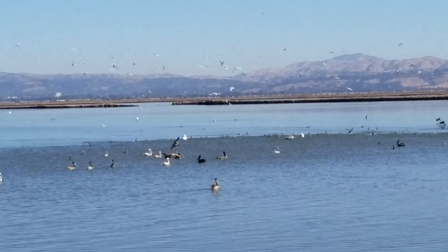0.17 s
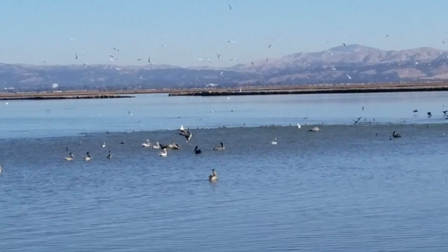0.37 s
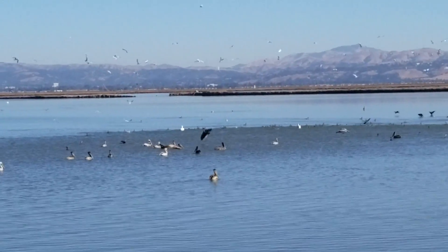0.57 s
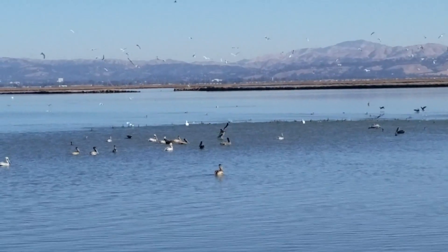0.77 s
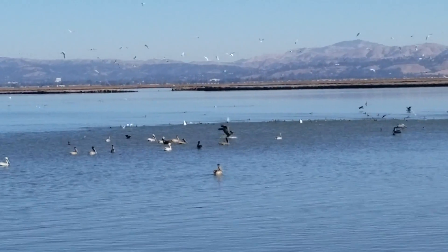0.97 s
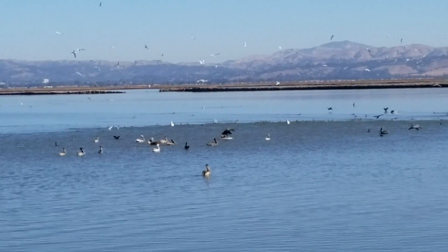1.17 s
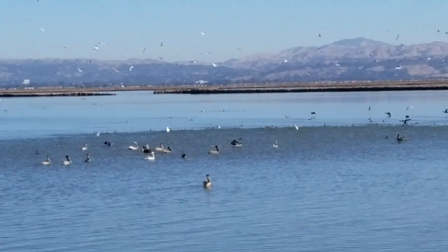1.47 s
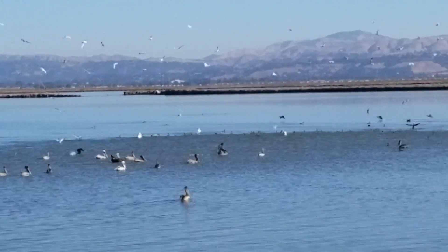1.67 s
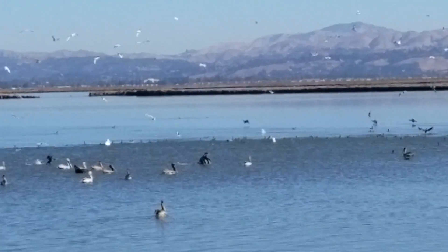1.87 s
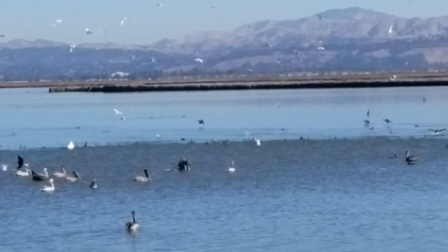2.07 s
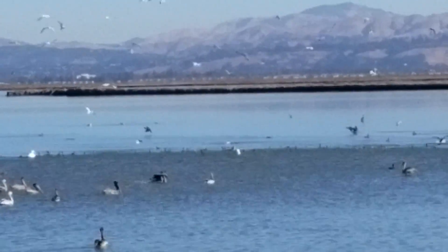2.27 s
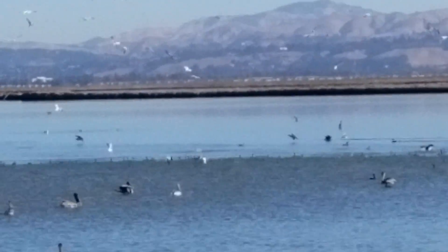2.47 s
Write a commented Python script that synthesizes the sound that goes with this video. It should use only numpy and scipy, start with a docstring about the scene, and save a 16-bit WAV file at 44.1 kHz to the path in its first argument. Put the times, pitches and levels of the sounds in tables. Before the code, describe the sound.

A flock of gulls and waterbirds calls nonstop over an open bay, with whistles, sliding chirps, pips and dry rattles; low wind rumble and faint engine hum behind, one pop on the left of a handheld stereo microphone.

```python
"""A flock of terns, gulls and waders calls over a calm bay: arched whistles, slides, short pips, trills, and
harsh keks and rattles, all swept sines, most with overtones, over a random babble of far pips.
A handheld two-microphone recorder shades its left port from part of the birds' treble; that port pops once,
a filtered pressure step, and the case rustles three times, bursts of bright noise.
Behind lie a faint engine hum of three wavering sines and a shaped noise bed of wind, water and microphone hiss."""
import sys
import numpy as np
from scipy import signal
from scipy.fft import rfft, irfft, next_fast_len
from scipy.io import wavfile
from scipy.ndimage import uniform_filter1d, map_coordinates

SR = 44100
rng = np.random.default_rng(int(sys.argv[2]) if len(sys.argv) > 2 else 0)


def log_audio(samples):
    """Write samples as a 16-bit WAV file to the path given in sys.argv[1]."""
    # one column per channel
    frames = np.atleast_2d(samples).T
    # limit to full scale, then quantise
    limited = np.clip(frames, -1, 1)
    pcm = np.round(limited * 32767).astype(np.int16)
    wavfile.write(sys.argv[1], SR, pcm)


def makeup_ratio(level_db):
    """Linear amplitude ratio for a level in decibels (20 dB per factor of ten)."""
    decades = np.asarray(level_db, float) / 20
    return 10 ** decades


N = 115101  # samples


def unit(x):
    """Scales to rms 1."""
    return x / np.sqrt(np.mean(x ** 2) + 1e-20)


def along(points, hz):
    """Reads a curve of (Hz, value) points on a log frequency axis."""
    f, v = np.transpose(points)
    return np.interp(np.log(hz + 1), np.log(f + 1), v)


def wobble(rate):
    """A smooth random curve with rate knots a second."""
    knots = rng.standard_normal(int(N * rate / SR) + 4)
    return map_coordinates(knots, [np.arange(N) * rate / SR])


def filtered(x, response):
    """Filters x by a complex response of frequency."""
    m = next_fast_len(N + SR // 2)
    return irfft(rfft(x, m) * response(np.fft.rfftfreq(m, 1 / SR)), m)[..., :N]


EDGE_S, WAVER, FLUTTER_DB = 0.0053, 0.0041, 1.08  # fade, pitch unsteadiness as a share, level unsteadiness
RASP, KEK_RASP = 0.2, 0.4  # depth of the fast roughness
# Unsteadiness shared by all calls: pitch, breath and rasp
PITCH_SHAKE, BREATH_SHAKE, RASP_SHAKE = [np.pad(wobble(rate), (0, SR)) for rate in (150, 120, 2500)]


def add_call(out, start, length, db, pitch, overtones, rasp=RASP):
    """Adds one voiced call: pitch(u) over u 0-1, overtones(multiple, Hz) its gains, with soft edges."""
    at = round(start * SR)
    t = np.arange(max(round(length * SR), 8)) / SR
    here = slice(at, at + len(t))
    hz = pitch(t / length)
    to_edge = np.minimum(t, length - t) / min(EDGE_S, length / 2)
    fade = np.sin(np.pi / 2 * np.clip(to_edge, 0, 1)) ** 2
    turns = np.cumsum(hz * (1 + WAVER * PITCH_SHAKE[here])) / SR
    tone = sum(overtones(k, k * hz) * np.sin(2 * np.pi * k * turns) for k in range(1, 9))
    breath = makeup_ratio(db + FLUTTER_DB * BREATH_SHAKE[here])
    out[here] += breath * fade * tone * (1 + rasp * RASP_SHAKE[here])


# Arched whistles; a strong octave overtone has its own row. Each row: start in seconds, length in seconds,
# top pitch in Hz, drop from the top to either end in Hz, source level at the top in dB.
ARCHED_WHISTLES = [(0.283, 0.11, 4850, 291, -55.5), (0.29, 0.087, 9870, 570, -49.5),
                   (0.354, 0.054, 4630, 425, -42), (0.747, 0.091, 4677, 330, -42),
                   (0.207, 0.096, 4150, 79.5, -53.5), (1.033, 0.042, 4400, 350, -52.5),
                   (1.036, 0.041, 3380, 278, -56), (1.44, 0.082, 4506, 382, -45),
                   (1.457, 0.082, 3560, 360, -52.5), (1.66, 0.098, 3570, 477, -55),
                   (1.676, 0.075, 4647, 504, -43.5), (1.839, 0.081, 6280, 1970, -50),
                   (1.885, 0.062, 3350, 204, -51.5), (1.941, 0.085, 4717, 300, -50.5),
                   (2.283, 0.061, 4484, 420, -46), (2.352, 0.095, 4560, 206, -53.5),
                   (2.368, 0.03, 2786, 277, -34.5)]
SWELL_DB = 4  # an arch is this much louder at its top than at its ends


def arched_whistles(out):
    """One tone per row, its pitch following a parabola and its level swelling with it."""
    for s, length, top, bend, db in ARCHED_WHISTLES:
        add_call(out, s, length, db,
                 lambda u: top - bend * (2 * u - 1) ** 2,
                 lambda k, hz: (k == 1) * makeup_ratio(SWELL_DB * (hz - top) / bend))


OCTAVE_DB = -11  # overtone against the fundamental


def clear(k, hz):
    """A clear spectrum: one tone and its weak octave."""
    return makeup_ratio(OCTAVE_DB * (k - 1)) * (hz < SR / 3) * (k <= 2)


# Straight slides; a strong octave overtone has its own row. Each row: start in seconds, length in seconds,
# first pitch in Hz, last pitch in Hz, source level in dB.
PITCH_SLIDES = [(0.485, 0.04, 3700, 3170, -43.5), (0.592, 0.056, 5370, 4840, -52.5),
                (0.582, 0.066, 2790, 2385, -56.5), (0.774, 0.019, 3260, 3250, -39),
                (1.095, 0.023, 2940, 3360, -42.5), (1.14, 0.025, 4690, 4000, -37),
                (1.159, 0.023, 3074, 3280, -43), (1.193, 0.017, 3030, 3250, -45.5),
                (1.234, 0.024, 3180, 2960, -39.5), (1.265, 0.021, 4320, 3850, -40),
                (1.283, 0.026, 3100, 3160, -38), (1.32, 0.021, 4230, 3860, -41.5),
                (1.335, 0.04, 3186, 3055, -40.5), (2.012, 0.034, 4220, 3824, -42),
                (2.103, 0.027, 2980, 3450, -40), (2.107, 0.033, 4590, 3955, -38.5),
                (2.238, 0.022, 2906, 3275, -38), (2.255, 0.026, 4300, 4100, -49.5),
                (2.138, .04, 3080, 2794, -44), (2.388, 0.021, 3990, 3480, -43)]


def slides(out):
    """Tones whose pitch moves in a straight line."""
    for s, length, first, last, db in PITCH_SLIDES:
        add_call(out, s, length, db, lambda u: first + (last - first) * u, clear)


PIP_S, PIP_FALL = .0125, 0.039  # length, typical pitch slope as a share


def pip(out, s, hz, db):
    """A short clear note around s, mostly falling, each with its own random slope."""
    fall = PIP_FALL * (.5 + rng.standard_normal())
    add_call(out, s - PIP_S / 2, PIP_S, db, lambda u: hz * (1 + fall * (1 - 2 * u)), clear)


# Short pips, alone or in loose close groups. Each row: middle in seconds, pitch in Hz, source level in dB.
SHORT_PIPS = [(0.373, 2386, -35.5), (0.439, 2260, -49), (2.234, 2697, -34), (1.745, 2344, -47.5),
              (2.277, 1840, -45.5), (2.355, 3100, -41), (0.405, 2410, -37), (0.418, 2360, -39.5),
              (.453, 2310, -35.5), (.469, 2453, -38.5), (0.551, 3310, -47.5), (0.566, 3260, -48),
              (0.869, 1950, -42.5), (2.273, 2820, -43.5), (1.796, 2384, -40.5), (1.824, 2310, -40.5),
              (1.836, 2007, -41.5), (1.86, 2190, -42), (1.877, 2300, -40), (2.316, 1883, -40),
              (0.019, 4410, -44),]


def short_pips(out):
    """Short notes, alone or in loose close groups."""
    for row in SHORT_PIPS:
        pip(out, *row)


UNEVEN = .008  # pitch scatter of trill notes as a share; rattles stray ten times this share of a gap
# Runs of pips. Each row: middle of the first note in seconds, gap in seconds, number of notes,
# first pitch in Hz, first source level in dB.
PIP_TRILLS = [(1.862, 0.031, 3, 4100, -39.5), (1.938, 0.013, 5, 2237, -42), (.52, .0135, 5, 2313, -38.5),
              (2.143, 0.014, 3, 4530, -41.5), (2.191, 0.012, 3, 2893, -38), (2.191, 0.018, 3, 4480, -40.5)]
SINK, FADE_DB = 0.0218, 1.4  # pitch share and level lost per note


def trills(out):
    """Evenly spaced pips that sink in pitch and fade."""
    for s, gap, notes, hz, db in PIP_TRILLS:
        for k in range(round(notes)):
            note_hz = hz * (1 - SINK * k + UNEVEN * rng.standard_normal())
            pip(out, s + k * gap, note_hz, db - FADE_DB * k)


KEK_S, KEK_RISE = .011, 0.06  # length, pitch rise either side of the middle as a share
THROAT_MID_HZ, THROAT_HZ, GAPE = 3760, 900, 0.25  # resonance, its width, its variation as a share


def kek(out, s, hz, db):
    """A short rising stack of harmonics through the throat, whose gape differs from note to note."""
    throat = THROAT_MID_HZ * (1 + GAPE * rng.uniform(-0.75, 1))
    add_call(out, s - KEK_S / 2, KEK_S, db,
             lambda u: hz * (1 + KEK_RISE * (2 * u - 1)),
             lambda k, f: (1 + ((f - throat) / THROAT_HZ) ** 2) ** -.7, KEK_RASP)


# Harsh keks, alone or close together. Each row: middle in seconds, pitch in Hz, source level in dB.
HARSH_KEKS = [(0.328, 1223, -42), (0.761, 1410, -43.5), (0.814, 1416, -40), (0.828, 1238, -41.5),
              (0.851, 1735, -33.5), (0.891, 1213, -37), (0.909, 1216, -43.5), (0.946, 1257, -39.5),
              (0.954, 1230, -40)]


def harsh_keks(out):
    """Harsh notes, alone or close together."""
    for row in HARSH_KEKS:
        kek(out, *row)


# Rattles of keks. Each row: middle of the first note in seconds, gap in seconds, number of notes,
# mid-rattle pitch in Hz, mid-rattle source level in dB.
KEK_RATTLES = [(1.262, 0.016, 4, 1608, -39), (1.395, 0.014, 4, 1570, -42.5), (1.576, 0.014, 4, 1406, -38),
               (2.054, 0.016, 3, 1533, -37)]
RATTLE_SAG, RATTLE_SWELL_DB = 0.044, 4.5  # pitch share and level lost at either end


def rattles(out):
    """Quick, slightly uneven runs of keks that swell and rise towards the middle."""
    for s, gap, notes, hz, db in KEK_RATTLES:
        for k, u in enumerate(np.linspace(-1, 1, round(notes))):
            when = s + (k + 10 * UNEVEN * rng.standard_normal()) * gap
            kek(out, when, hz * (1 - RATTLE_SAG * u * u), db - RATTLE_SWELL_DB * u * u)


def babble(out):
    """Far calls: quiet pips strewn at random in time, pitch and level."""
    count, middle_hz, log_spread, level_db = 260, 3700, .25, -60.5
    for when, high, loud in rng.standard_normal((count, 3)):
        s = PIP_S + (when * 10 % 1) * N / SR
        pip(out, s, middle_hz * np.exp(log_spread * high), level_db + 3 * loud)


def flock():
    """Sums the near calls and the far babble."""
    out = np.zeros(N + SR)
    for calls in (arched_whistles, slides, short_pips, trills, harsh_keks, rattles, babble):
        calls(out)
    return out[:N]


# Treble loss of the birds on the way. Each row: frequency in Hz, gain in dB.
AIR_LOSS = [(5200, -0.5), (5900, -11.5), (10000, -22.5)]
# Left port against right for the birds. Each row: frequency in Hz, gain in dB.
LEFT_SHADE = [(2700, -1), (3150, -9), (4500, -18.5), (7000, 6)]
LEFT_LAG_S, SCATTER_DB, SCATTER_T60_S = .00003, -4, 0.057  # left port lag; echoes off the water


def ports(x):
    """Echoes off the water as decaying noise tails, treble loss, and the shaded, late left port."""
    t = np.arange(SR // 4) / SR
    tail = rng.standard_normal((2, len(t))) * makeup_ratio(-60 * t / SCATTER_T60_S)
    tail = tail / np.linalg.norm(tail[0])
    echoes = signal.fftconvolve(x[None], tail, axes=1)[:, :N]

    def response(f):
        left = makeup_ratio(along(LEFT_SHADE, f)) * np.exp(-2j * np.pi * f * LEFT_LAG_S)
        return makeup_ratio(along(AIR_LOSS, f)) * np.array([left, np.ones(len(f))])

    return filtered(x + makeup_ratio(SCATTER_DB) * echoes, response)


POP_S, POP_DB, POP_HZ, POP_DAMP = 1.2276, -0.5, 147, 0.79  # time, step height, low cut and its damping
PORT_NOTCH_HZ, PORT_WIDTH_HZ = 8030, 13200


def port_pop():
    """A downward pressure step, let down by the microphone's low cut and notched by the port."""
    kick = np.zeros(N)
    kick[0] = makeup_ratio(POP_DB)

    def response(f):
        step = 1j * f * SR / (2 * np.pi) / (POP_HZ ** 2 - f * f + 2j * POP_DAMP * POP_HZ * f)
        off_notch = PORT_NOTCH_HZ ** 2 - f * f
        notch = (off_notch + 1j * f * 400) / (off_notch + 1j * f * PORT_WIDTH_HZ)
        return -step * notch * np.exp(-2j * np.pi * f * POP_S)

    return filtered(kick, response) * np.array([[1], [0]])  # left only


# Rustles of the case. Each row: middle in seconds, noise level before the high-pass in dB, length in seconds.
CASE_RUSTLES = [(0.221, -55.5, 0.052), (0.997, -52, 0.0037), (2.553, -55, 0.0059)]


def case_rustles():
    """Thin bright rustles: high-passed noise under bell-shaped swells, 4 dB weaker on the left."""
    t = np.arange(N) / SR
    swell = sum(makeup_ratio(db) * np.exp(-(2 * (t - s) / length) ** 2) for s, db, length in CASE_RUSTLES)
    noise = swell * rng.standard_normal((2, N))
    return filtered(noise, lambda f: f * f / (f * f + 6500 ** 2)) * makeup_ratio([[-4], [0]])


# Engine orders. Each row: frequency in Hz, mid-scene level in dB rms before the left-right offset.
ENGINE_ORDERS = [(126, -56), (252, -59), (378.5, -61)]
TOP_RISE_DB_PER_S = 4.5  # for the highest order; lower ones rise in proportion to frequency


def engine_hum():
    """A far engine's orders, unsteady in phase, slowly nearing; 2.4 dB stronger on the right."""
    t = np.arange(N) / SR
    tones = 0
    for hz, db in ENGINE_ORDERS:
        rise_db = TOP_RISE_DB_PER_S * hz / ENGINE_ORDERS[-1][0] * (t - t.mean())
        tones = tones + makeup_ratio(db + rise_db) * np.sin(2 * np.pi * hz * t + 0.42 * wobble(6.6))
    return np.sqrt(2) * tones * makeup_ratio([[-1.2], [1.2]])


# Colour of wind, water and microphone hiss. Each row: frequency in Hz, relative density in dB per Hz.
BED_COLOUR = [(22, -47), (50, -6.5), (114, 1), (754, -21), (2800, -29.5), (4700, -38.5), (5600, -42),
              (9500, -50), (13000, -45.5)]
# Likeness of the ports. Each row: frequency in Hz, left-right correlation from 0 to 1.
PORT_LIKENESS = [(150, 0.98), (900, 0.58), (3000, 0)]
# Balance of the bed. Each row: frequency in Hz, left minus right in dB.
BED_LEAN = [(1000, -2.5), (8000, -2.5), (12000, 0)]
BED_DB = -44  # rms over both ports


def bed():
    """Patchy shaped noise, most alike at both ports in the bass, with a rumble that comes in lumps."""
    z = signal.stft(rng.standard_normal((2, N)), nperseg=512)[2]
    patches = uniform_filter1d(rng.standard_normal(z.shape[1:]), 6, 0)  # across frequency
    patches = uniform_filter1d(patches, 10, 1)  # along time
    pair = signal.istft(z * makeup_ratio(1.65 * unit(patches)), nperseg=512)[1][:, :N]

    def mid_side(f):
        turn = np.arccos(np.clip(along(PORT_LIKENESS, f), -1, 1)) / 2
        return makeup_ratio(along(BED_COLOUR, f)) * np.array([np.cos(turn), np.sin(turn)])

    mid, side = filtered(pair, mid_side)
    both = np.array([mid + side, mid - side])
    both = filtered(both, lambda f: makeup_ratio(along(BED_LEAN, f) * np.array([[.5], [-.5]])))
    rumble = filtered(both, lambda f: 1 / (1 + (f / 350) ** 2))
    lumps = makeup_ratio(1.7 * wobble(2.06))
    return makeup_ratio(BED_DB) * unit(both - rumble + rumble * lumps)


def scene():
    """Sums birds, pop, rustles, hum and bed."""
    return ports(flock()) + port_pop() + case_rustles() + engine_hum() + bed()


def band_limit(x):
    """A steep low-pass at the top of the band."""
    return signal.sosfilt(signal.butter(12, 17030, fs=SR, output="sos"), x)


def record(dry):
    """The recorder's band limit: nothing from 15.8 kHz up."""
    mix = filtered(dry, lambda f: f < 15800)
    return band_limit(mix)


dry = scene()
out = record(dry)
log_audio(out)
```